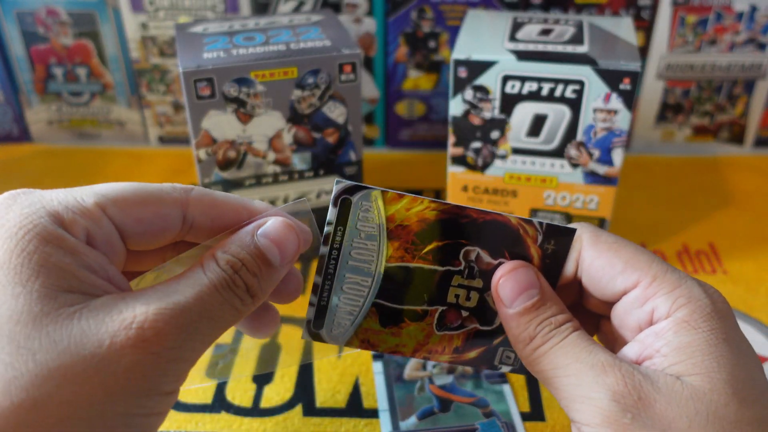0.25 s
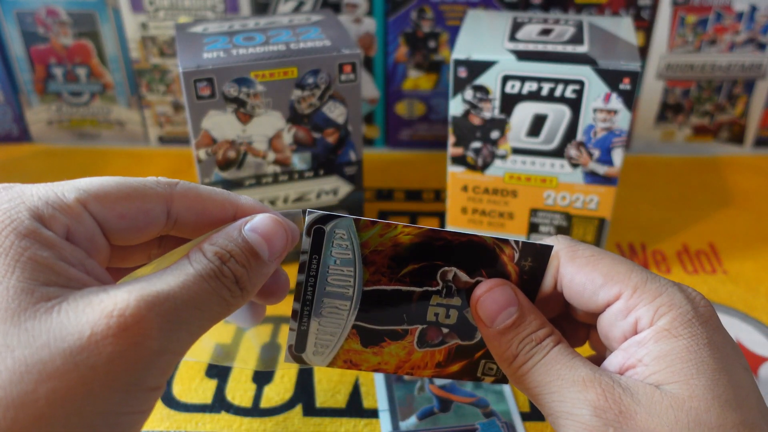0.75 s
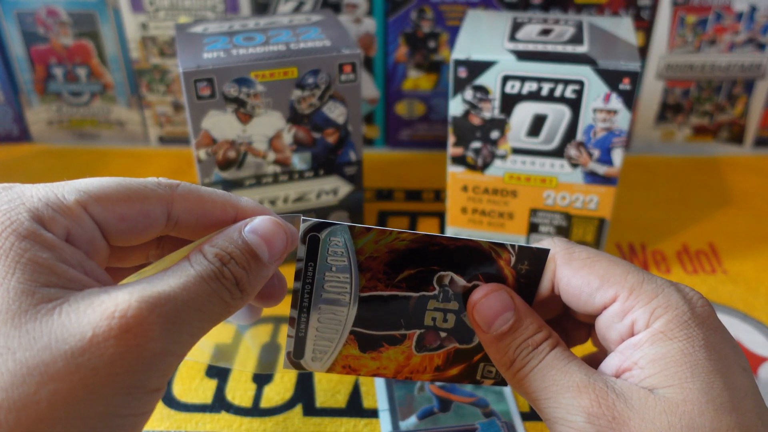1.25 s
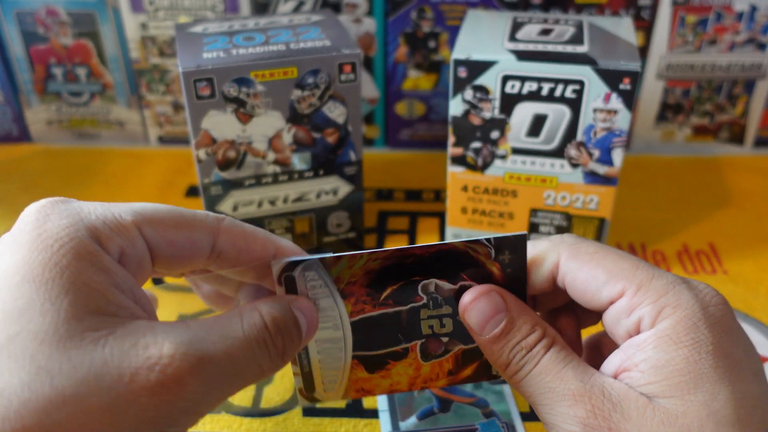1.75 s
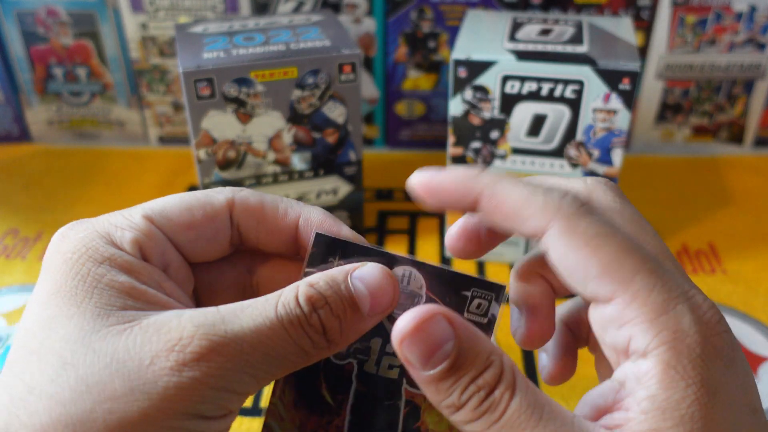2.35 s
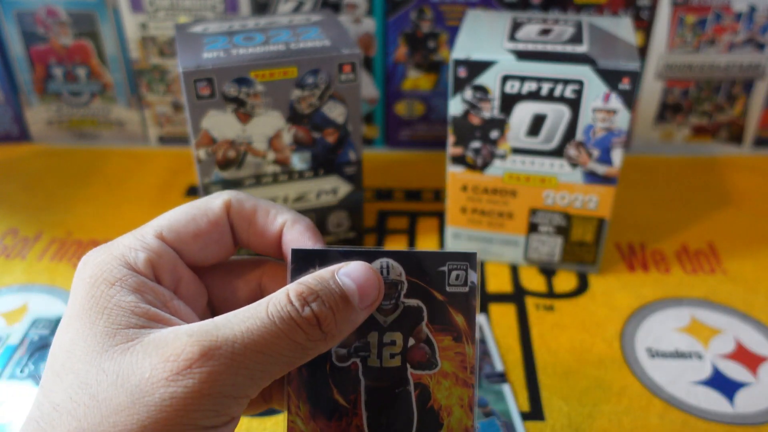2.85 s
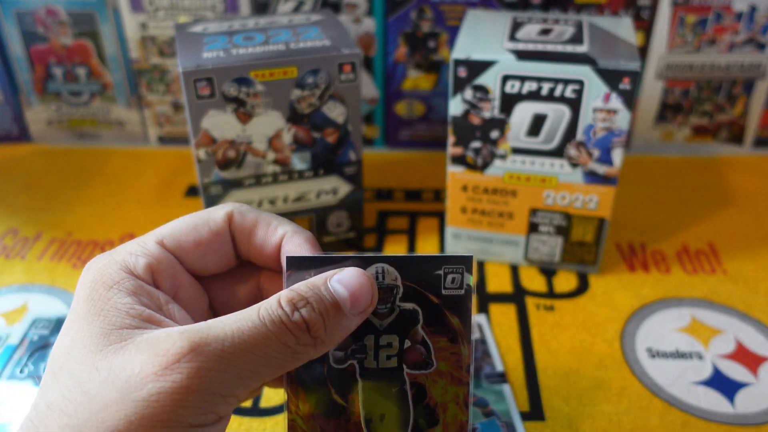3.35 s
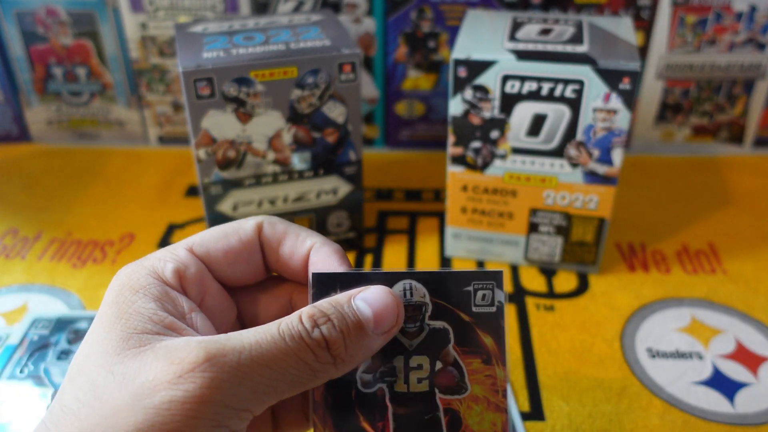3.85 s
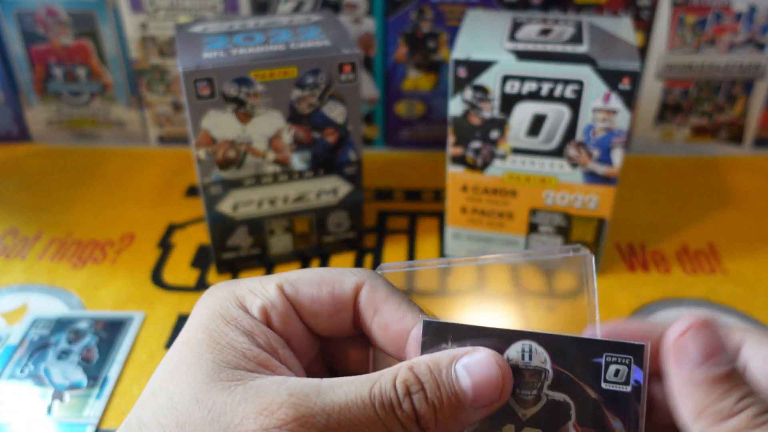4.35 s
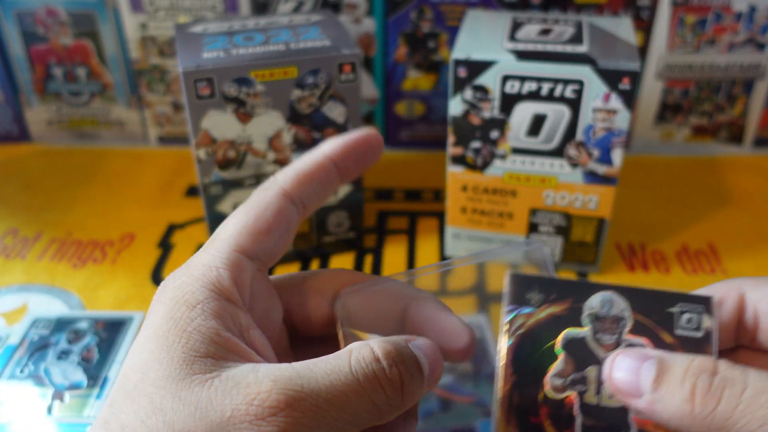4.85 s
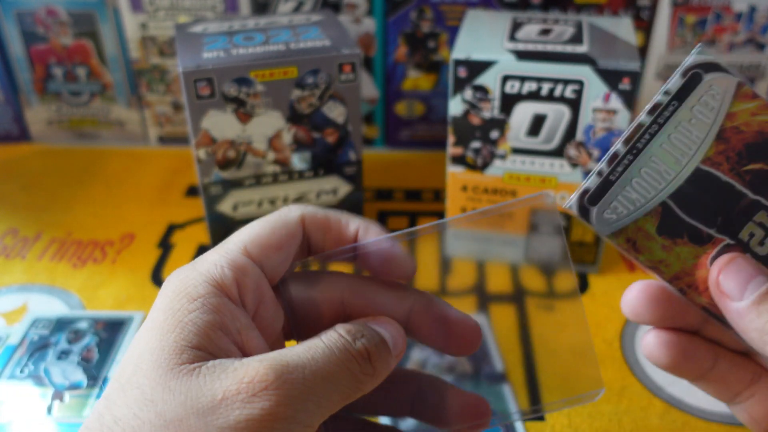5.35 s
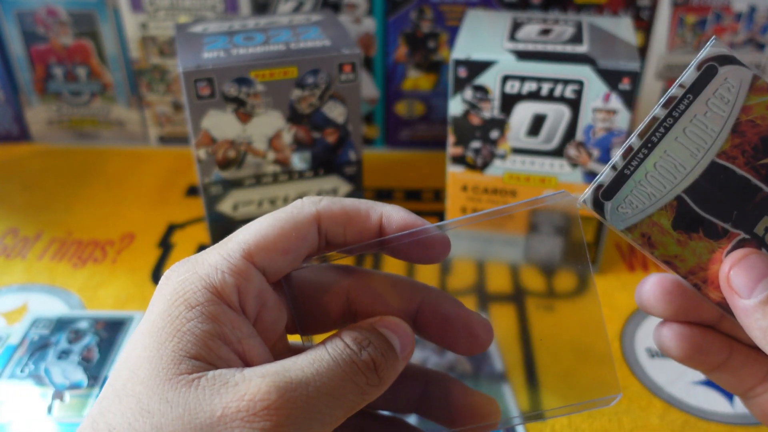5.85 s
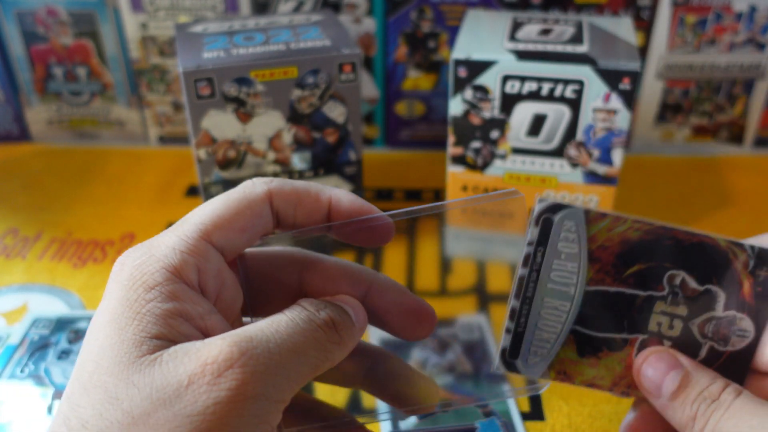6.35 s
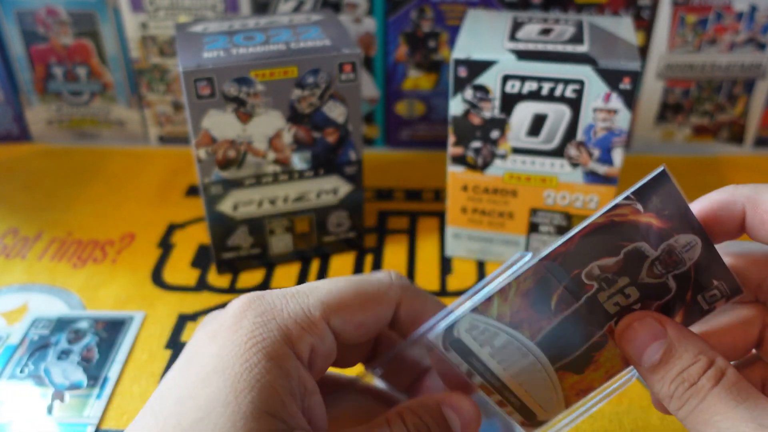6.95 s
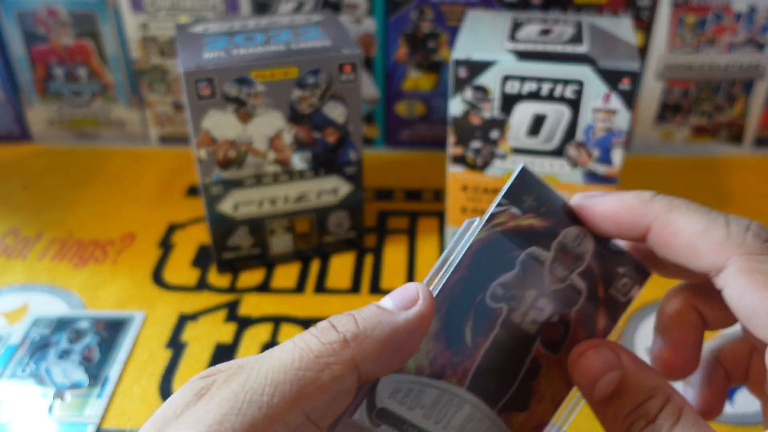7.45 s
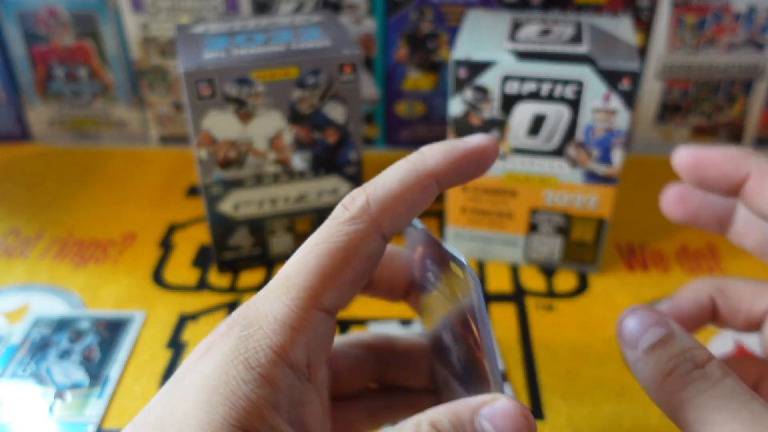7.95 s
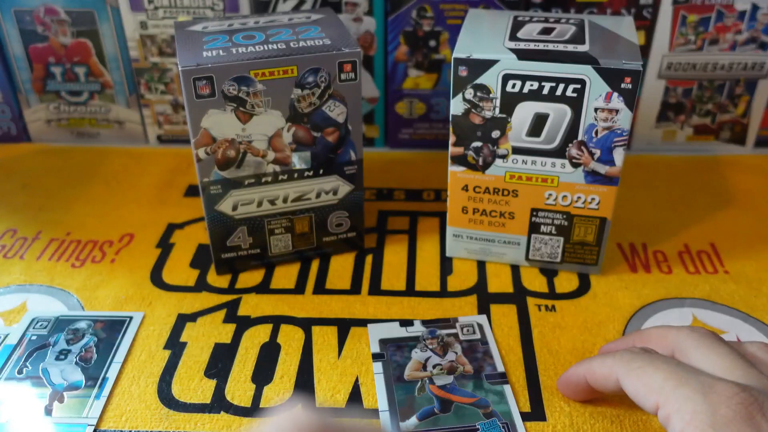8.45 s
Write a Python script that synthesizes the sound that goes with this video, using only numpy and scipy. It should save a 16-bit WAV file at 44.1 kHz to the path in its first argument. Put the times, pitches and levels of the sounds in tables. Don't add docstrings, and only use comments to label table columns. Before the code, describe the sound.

A small room heard from close above a padded table, with steady low motor hum, faint hiss and deep rumble from leaning arms. From 0 to 0.9 s, small dry ticks of fingertips, card and stiff film, densest at the start. It is almost quiet until 1.65 s, then soft rubbing and light clicks, a bright crease pop at 2.2 s, and a fuller brushing stroke with a faint high squeak around 2.7 s. The card taps the mat at 3.1 s and more sharply at 3.4 s. From 3.5 to 5 s, holder strokes, clicks and thin squeaks; at 5.1-5.4 s, a rapid run of bright, ringing plastic flicks. Sparse clicks and gentle sliding follow from 5.6 to 7 s, then denser scraping, a faint two-toned squeak at 7.2 s and a loud crisp snap at 7.4 s. Rubbing fades; at 8.5 s a hand lands in a strong, woody double thump that rings briefly.

```python
import sys
import numpy as np
from scipy import signal
from scipy.fft import rfft, irfft, next_fast_len
from scipy.io import wavfile
from scipy.ndimage import map_coordinates

SR = 44100
rng = np.random.default_rng(int(sys.argv[2]) if len(sys.argv) > 2 else 0)


def magnitude_from_level(level_db):
    exponent = np.asarray(level_db, float) / 20
    return 10 ** exponent


def inscribe(sig):
    pcm = np.round(np.clip(np.atleast_2d(sig).T, -1, 1) * 32767)
    wavfile.write(sys.argv[1], SR, pcm.astype(np.int16))


N = 383650
SPAN = 16384
STEP = 128

# start_s, peak_db, ring_hz, room_answer_db
SNAPS = [(0.092, -30.5, 5400, -7), (0.115, -31, 3570, -8.5), (1.9736, -51.5, 3220, 2.5),
         (4.3278, -35, 3600, -4), (4.369, -31, 4640, -7), (4.5362, -37, 3120, -6), (5.1153, -46, 3000, 0),
         (5.8672, -35, 5800, -10.5), (6.036, -40.5, 4970, -9), (6.3458, -41, 4400, -5.5),
         (8.2942, -42.5, 3900, 4)]
# start_s, peak_db, ring_hz, room_answer_db
TAPS = [(0.0501, -38.5, 5800, -5), (0.0543, -38, 6300, -11), (.121, -35.5, 6500, -9),
        (.247, -52, 3530, -11), (.4564, -35.5, 3700, -3), (0.636, -43, 5400, -9), (0.7852, -47.5, 3180, -9),
        (1.692, -35.5, 5140, -4), (1.8225, -43.5, 4500, -3.5), (1.835, -43.5, 2600, -3),
        (1.76, -43, 5000, -8), (2.161, -45, 3200, -13), (6.905, -50, 4300, -10), (2.319, -48, 9100, 0),
        (3.397, -25.5, 4500, -1.5), (3.4033, -22.5, 4570, -10), (7.306, -42, 7060, -2),
        (7.3413, -45, 3690, -6)]
# start_s, peak_db, ring_hz, room_answer_db
FLICKS = [(3.079, -31.5, 4100, -3.5), (3.747, -46.5, 5800, 5), (3.757, -46, 6500, 3.5),
          (4.7117, -31.5, 5140, -7.5), (5.088, -49, 3630, -10), (5.1143, -42, 12500, -14),
          (5.8676, -41, 11000, -10), (5.1297, -28.5, 5050, -12), (5.3119, -29.5, 5150, -4),
          (5.3315, -31.5, 5040, -5), (5.352, -31, 5300, -8), (5.373, -34, 5200, -8.5),
          (.8979, -56, 3370, -5), (5.7244, -56, 3140, -11), (3.932, -51, 7000, -10),
          (6.7602, -43, 4970, -3.5)]
# start_s, peak_db, ring_hz,
# room_answer_db
CREASES = [(0.2897, -43, 5500, -9), (0.321, -38.5, 5300, -8), (.35, -48, 7000, -8),
           (0.451, -34.5, 6760, -8), (0.654, -45, 4640, -12), (1.3255, -47, 3260, -11),
           (1.6586, -45, 5740, -5), (2.171, -27, 8700, -8.5), (2.3353, -41.5, 5800, -14),
           (3.379, -37, 3130, 3), (3.5735, -40, 4160, 1), (3.6015, -38.5, 5700, -6.5),
           (4.2523, -40.5, 4860, -6.5), (4.55, -34, 3480, -27), (4.6188, -38.5, 5200, -4.5),
           (4.8742, -45.5, 4430, -6), (5.028, -51, 3740, -9), (5.607, -54, 4870, -11),
           (6.1633, -47.5, 5070, -7), (6.3877, -44.5, 4470, -11), (6.627, -45, 5030, -3),
           (7.861, -41, 5840, -16), (6.651, -43.5, 5400, 1.5), (6.713, -41.5, 6000, -4),
           (7.32, -54, 9000, -13), (7.4233, -19.5, 7330, -10.5), (8.524, -40, 4300, 6.5)]
# dull_part_db, bright_part_db
CLICK_COLOURS = [
    (2.5, -1.5),
    (-0.5, -13),
    (-12, -7.5),
    (-17, -14),
]
# start_s, pitch_hz, width_hz, level_db
RINGS = [(.092, 3670, 250, -42), (4.1, 2400, 300, -48), (4.712, 3600, 240, -40), (4.712, 7240, 330, -42),
         (5.13, 5030, 170, -36), (5.131, 8000, 350, -45), (5.313, 6750, 300, -43), (5.313, 3100, 200, -39),
         (5.352, 4800, 200, -40), (8.5205, 1540, 720, -28), (8.54, 870, 440, -26), (4.75, 3530, 150, -51),
         (3.405, 250, 98, -39), (7.424, 7100, 2400, -31), (.6365, 5600, 500, -52), (5.13, 3650, 160, -43),
         (5.313, 5310, 190, -33.5), (7.335, 2500, 180, -44), (7.776, 4400, 1400, -48),
         (2.73, 250, 150, -30.5), (3.4, 610, 300, -26), (8.18, 10400, 3500, -51), (8.525, 214, 28, -22),
         (2.36, 1140, 59, -50.5), (.12, 580, 200, -42.5)]

# middle_s, length_s, film_db, colour_hz,
# edge_over_film_db
FILM_STROKES = [(.01, 0.11, -68, 5600, -9), (0.293, 0.21, -64, 5000, -12), (.6, .35, -74, 4800, -2),
                (1.31, .15, -77, 3900, -8), (1.724, 0.24, -55.5, 5270, -9), (1.844, 0.072, -57, 4500, -5),
                (1.927, .2, -67, 6000, -6), (2.047, 0.32, -63.5, 6500, -1.5), (2.14, .12, -62, 8400, -7),
                (2.323, 0.23, -66.5, 7500, 4), (2.752, 0.27, -54.5, 3950, -9),
                (3.2, 0.57, -65.5, 4800, -7), (3.315, 0.18, -64, 5500, -8),
                (3.466, 0.26, -51, 4400, -11), (3.723, 0.34, -57, 5000, -24),
                  (4.03, 0.22, -60, 5700, -6.5), (4.355, .2, -77, 5000, 4), (4.645, 0.34, -57.5, 5200, -5),
                  (4.904, 0.2, -62, 6000, -1), (5.04, 0.33, -61, 4900, -13), (5.188, 0.19, -69.5, 5400, 13),
                  (5.363, 0.14, -55, 5000, -6), (5.5, 0.29, -71.5, 5400, -2), (6.12, 0.29, -64, 5500, -6),
                  (6.367, 0.33, -65, 4600, -6), (6.733, 0.25, -63, 5800, 3), (6.913, 0.4, -61, 4700, -10),
                  (7.044, 0.087, -60.5, 5300, -5), (7.143, 0.15, -59, 5360, -7.5),
                  (7.37, 0.28, -56, 6200, -15), (7.596, 0.2, -51, 6700, -19),
                  (7.9, 0.33, -54.5, 4860, -10.5), (8.276, 0.3, -58, 4870, 0.5)]
# middle_s, length_s, card_db, palm_db
GRIPS = [(.15, .5, -53.5, -70), (0.528, 0.53, -63, -59), (1.784, 0.98, -83, -57.5), (2.13, 0.15, -62, -63),
         (2.34, 0.19, -84, -58), (2.73, 0.41, -71, -47.5), (2.762, 0.1, -44.5, -50), (3.155, 0.4, -79, -46),
         (3.448, 0.18, -48.5, -46), (3.618, 0.26, -69, -54.5), (4.036, 0.47, -61, -55.5),
         (4.536, 0.53, -70, -55), (4.887, 0.21, -68, -54.5), (5.224, 0.4, -64, -54),
         (6.197, 0.21, -71, -72), (6.85, 0.57, -58.5, -68), (7.192, 0.45, -61.5, -54.5),
         (7.385, 0.2, -51, -57), (7.914, 0.27, -59, -92), (8.205, .2, -57.5, -62), (8.296, 0.2, -50.5, -54),
         (8.7, 0.32, -44, -38)]
# film_db, edge_db, card_db, palm_db
REST_DB = (-82, -88.5, -75, -57)
FILM_HZ = np.array([3600, 5400, 8000])
# multiple_of_colour, level_db (per Hz)
FILM_SPECTRUM = [(.2, -70), (.5, -7), (.78, 2), (1, 3), (1.35, -1.5), (2.2, -22), (5, -68)]
# freq_hz, level_db (per Hz)
EDGE_SPECTRUM = [(2500, -58), (6000, -16.5), (9000, -10.5), (11000, -20.5), (13500, -17), (15700, -27),
                 (16000, -60)]
# freq_hz, level_db (per Hz)
CARD_SPECTRUM = [(300, -70), (1000, 1), (1600, 1), (2300, 0), (3500, -9.5), (7000, -15.5), (16000, -68)]
# freq_hz, level_db (per Hz)
PALM_SPECTRUM = [(60, -62), (130, 3.5), (250, 5.5), (600, -3), (1200, -5), (2500, -15.5), (8000, -84)]
# time_s, pitch_hz, level_db, upper_mode_db
SQUEAKS = [
    [(2.63, 10200, -68, -20), (2.71, 10000, -71, -20)],
    [(4.07, 9750, -65, -20), (4.12, 9650, -70, -20), (4.145, 8900, -80, -30), (4.21, 8900, -77, -30)],
    [(4.145, 11950, -80, -40), (4.17, 11750, -78, -40), (4.195, 11200, -80, -40)],
    [(7.18, 8900, -76, -5), (7.22, 9200, -72, -6), (7.265, 9350, -72, -6), (7.3, 9150, -68, -5)],
]

# start_s, peak_db, thud_db, slap_db, contact_s, body_hz
KNOCKS = [
    (3.088, -25, 3, -11, 0.0067, 690),
    (3.3958, -27.5, -6.5, 3, 0.0075, 253),
    (3.592, -43, -4, 23, 0.014, 845),
    (4.268, -39.5, 6, -2, 0.012, 268),
    (8.301, -47.5, 21.5, -14, 0.027, 280),
    (8.521, -13.5, -2, -10, 0.0064, 337),
    (8.5355, -10, -11, -13.5, 0.007, 320),
]
# pitch_hz, level_db, t60_s
TABLE_TOP = [(213, 10.5, 0.43), (249, 5.5, 0.17), (318, 8.5, 0.22), (484, 8, 0.14), (546, 0.5, 0.15),
             (728, -1, 0.042)]
# pitch_hz, level_db, t60_s
HAND_MODES = [(214, -3, .37), (253, -3.5, 0.34), (323, 4, 0.19), (354, -8, 0.26), (397, -14, .5),
              (494, -6, 0.23), (587, -9, 0.29), (690, -7, 0.2), (740, -6.5, 0.25), (888, -14.5, .35),
              (957, -18, .3), (1087, -17, 0.39), (1580, -19, 0.22), (1670, -21, .3)]
# pitch_hz, level_db, t60_s
CARD_MODES = [(450, -10.5, 0.24), (640, -7, .3), (687, -8, 0.23), (760, 3, .04), (904, -12, 0.26),
              (1034, -4.5, 0.25), (1136, -11, .3), (1389, -20, 0.26)]
# start_s, level_db, modes
STRUCK = [
    (8.5205, -18.5, HAND_MODES),
    (8.5365, -19.5, HAND_MODES),
    (3.0895, -30, CARD_MODES),
    (3.397, -44, CARD_MODES),
]

# freq_hz, t60_s
ROOM_DECAY = [(100, 0.31), (500, 0.3), (2000, 0.42), (6000, 0.39), (14000, 0.29)]
# delay_s, level_db
WALLS = [(.0034, -12), (.0072, -6), (.0158, -7), (.0245, -13)]

# pitch_hz, level_db (rms)
HUM = [(120, -47), (162, -64), (240, -67), (360, -58.5)]
# freq_hz, level_db (per Hz)
AIR = [(76, -28), (130, -1), (176, -7.5), (194, -10), (228, -6), (327, -21), (361, -8.5), (391, -86),
       (459, -20.5), (620, -18), (1040, -19.5), (1790, -22.5), (2150, -32), (2370, -45), (15600, -65)]
# freq_hz, level_db (per Hz)
HISS = [(1200, -30), (2500, -3.5), (6000, -4), (10000, -8), (15700, -8), (16000, -50)]
# time_s, sway_db
LEANING = [(0.0, -35.5), (0.51, -32.5), (0.61, -46.5), (1.38, -32.5), (1.48, -50), (1.82, -26.5),
           (3.05, -38), (3.39, -28), (3.54, -40), (4.8, -21.5), (6.13, -48.5), (6.25, -31), (6.76, -38.5),
           (7.07, -19.5), (7.78, -35), (7.87, -26.5), (8.21, -30), (8.7, -20.5)]
# freq_hz, level_db (per Hz)
SWAY = [(3, -36), (8, -3), (15, 13.5), (22, 5), (32, 3.5), (55, -31), (150, -120)]
# middle_s, length_s, level_db
JOLTS = [(0.435, 0.61, -51.5), (2.034, 0.16, -45), (2.207, 0.13, -51), (2.537, 0.35, -49.5),
         (2.834, 0.21, -44), (3.14, 0.16, -32.5), (3.644, 0.33, -46.5), (4.312, 0.57, -44),
         (4.551, 0.11, -36.5), (4.788, 0.32, -45.5), (5.287, 0.12, -40.5), (6.35, 0.12, -47),
         (6.74, 0.091, -48), (7.1, 0.78, -45), (7.458, 0.19, -52), (7.876, 0.18, -47), (8.317, 0.51, -49),
         (8.548, 0.15, -31), (8.7, 0.22, -31.5)]
# freq_hz, level_db (per Hz)
RUMBLE = [(8, -97), (22, -27), (40, -3), (60, -1), (95, -1.5), (125, -6), (200, -28.5), (500, -120)]


def unit(x):
    return x / np.sqrt(np.mean(x ** 2) + 1e-20)


def along(points, hz):
    f, v = np.transpose(points)
    return np.interp(np.log(hz + 1), np.log(f + 1), v)


def curves(rows):
    s, *columns = np.transpose(rows)
    return [np.interp(np.arange(N) / SR, s, column) for column in columns]


def wobble(rate):
    knots = rng.standard_normal(int(N * rate / SR) + 4)
    return map_coordinates(knots, [np.arange(N) * rate / SR])


def swell(s, length_s):
    t = np.arange(0, N + STEP, STEP) / SR
    return np.exp(-(3.71 * (t - s) / length_s) ** 2 / 2)


def smooth(control):
    return np.interp(np.arange(N) / STEP, np.arange(len(control)), control)


def filtered(x, response):
    m = next_fast_len(len(x) + 8192)
    return irfft(rfft(x, m) * response(np.fft.rfftfreq(m, 1 / SR)), m)[:len(x)]


def peak(f, hz, width_hz):
    return 1j * f * width_hz / (hz * hz - f * f + 1j * f * width_hz)


def causal(gain):
    size = 4096
    cepstrum = irfft(np.log(gain(np.fft.rfftfreq(size, 1 / SR)) + 1e-6))
    cepstrum[1:size // 2] *= 2
    cepstrum[size // 2 + 1:] = 0
    return irfft(np.exp(rfft(cepstrum)))[:size // 2]


def noise(spectrum, excite=1):
    return unit(filtered(excite * rng.standard_normal(N), lambda f: magnitude_from_level(along(spectrum, f))))


def echoed(x):
    out = np.pad(x, (0, SPAN))[:SPAN]
    return out + sum(magnitude_from_level(db) * np.pad(out, (round(s * SR), 0))[:SPAN] for s, db in WALLS)


def room(x, delay_s):
    hz, t, z = signal.stft(rng.standard_normal(SPAN), SR, nperseg=256)
    decay = magnitude_from_level(-60 * t / along(ROOM_DECAY, hz)[:, None])
    tail = signal.istft(z * decay, SR, nperseg=256)[1][:SPAN]
    tail = tail * (1 - np.exp(-np.arange(SPAN) / SR / delay_s))
    return signal.fftconvolve(x, tail / np.linalg.norm(tail))[:SPAN]


def clicks():
    out, t = np.zeros(N + SPAN), np.arange(600) / SR
    kinds = zip((SNAPS, TAPS, FLICKS, CREASES), CLICK_COLOURS)
    every = [row + colour for rows, colour in kinds for row in rows]
    for s, db, hz, room_db, dull_db, bright_db in every:
        bands_db = np.minimum(2.8 * rng.standard_normal(160), 3.5)

        def colour(f):
            ring = abs(peak(f, hz, 0.68 * hz)) ** 2 + 0.35 * abs(peak(f, hz, 0.04 * hz))
            dull = magnitude_from_level(dull_db + 6.5) * abs(peak(f, 1800, 3000)) ** 2
            bright = magnitude_from_level(bright_db + 0.5) * abs(peak(f, 7940, 4300)) ** 2
            damping = magnitude_from_level(np.interp(f / 140, np.arange(len(bands_db)), bands_db))
            return (ring + dull + bright) * damping

        plastic = causal(colour)
        envelope = magnitude_from_level(-60 * t / 0.011) * (1 - np.exp(-t / 0.00058))
        snap = np.convolve(plastic, envelope * rng.standard_normal(len(t)))
        snap = magnitude_from_level(db) * snap / np.abs(snap).max()
        answer = room(plastic / np.linalg.norm(plastic) * np.linalg.norm(snap), delay_s=0.0081)
        out[round(s * SR):][:SPAN] += echoed(snap) + magnitude_from_level(room_db + 8) * answer
    return out[:N]


def rings():
    out = np.zeros(N + SPAN)
    for s, hz, width_hz, db in RINGS:
        mode = causal(lambda f: abs(peak(f, hz, width_hz)) ** 2)
        answer = room(mode, delay_s=0.0046)
        both = answer + magnitude_from_level(-4) * echoed(mode)
        out[round(s * SR):][:SPAN] += magnitude_from_level(db - 7) * both / np.abs(answer).max()
    return out[:N]


def rubbing():
    slips_db = 1.6 * wobble(500) + 1.5 * wobble(60) + 1.8 * wobble(22)
    slips = magnitude_from_level(slips_db + 1.5 * np.clip(wobble(200), 0, 2.4) ** 1.5)
    films = [noise([(hz * multiple, db) for multiple, db in FILM_SPECTRUM], slips) for hz in FILM_HZ]
    edge = magnitude_from_level(4.0) * noise(EDGE_SPECTRUM, slips)
    card, palm = noise(CARD_SPECTRUM, slips), noise(PALM_SPECTRUM, slips)

    film_rest, edge_gain, card_gain, palm_gain = magnitude_from_level(np.array(REST_DB))
    count = len(FILM_HZ)
    film_gain = film_rest * np.ones((count, 1)) / np.sqrt(count)
    for s, length_s, db, hz, edge_db in FILM_STROKES:
        place = np.interp(np.log(hz), np.log(FILM_HZ), np.arange(count))
        shares = np.sqrt(np.clip(1 - abs(place - np.arange(count)), 0, 1))
        stroke = magnitude_from_level(db) * swell(s, length_s)
        film_gain = film_gain + shares[:, None] * stroke
        edge_gain = edge_gain + magnitude_from_level(edge_db) * stroke
    for s, length_s, card_db, palm_db in GRIPS:
        grip = swell(s, length_s)
        card_gain = card_gain + magnitude_from_level(card_db) * grip
        palm_gain = palm_gain + magnitude_from_level(palm_db) * grip
    gains = (*film_gain, edge_gain, card_gain, palm_gain)
    layers = (*films, edge, card, palm)
    return magnitude_from_level(-5.5) * sum(smooth(gain) * layer for gain, layer in zip(gains, layers))


def squeaks():
    out, t = np.zeros(N), np.arange(N) / SR
    for rows in SQUEAKS:
        hz, db, upper_db = curves(rows)
        fade = np.clip(np.minimum(t - rows[0][0], rows[-1][0] - t) / 0.012, 0, 1)
        phase = 2 * np.pi * np.cumsum(hz + 45 * wobble(150)) / SR
        whistle = np.sin(phase) + magnitude_from_level(upper_db) * np.sin(1.22 * phase)
        out += fade * magnitude_from_level(db + 4 * wobble(70)) * whistle
    return out


def knocks():
    out, t = np.zeros(N + SPAN), np.arange(SPAN) / SR
    for s, db, thud_db, slap_db, contact_s, hz in KNOCKS:
        push = rng.standard_normal(SPAN) * np.exp(-t / contact_s) * (1 - np.exp(-t / 0.0008))

        def colour(f):
            modes = sum(magnitude_from_level(level) * abs(peak(f, c, 6 / t60)) for c, level, t60 in TABLE_TOP)
            body = abs(peak(f, hz, 1.47 * hz)) ** 2 * (1 + 0.79 * modes)
            slap = magnitude_from_level(slap_db) * abs(peak(f, 1040, 1520)) ** 2 / (1 + (f / 2200) ** 4)
            return body + slap

        top = causal(colour)
        blow = signal.fftconvolve(push, top)[:SPAN]
        blow = magnitude_from_level(db) * blow / np.abs(blow).max()
        answer = room(top / np.linalg.norm(top) * np.linalg.norm(blow), delay_s=0.0067)
        thud = filtered(push, lambda f: peak(f, 39, 50) ** 2)
        thud = magnitude_from_level(db + thud_db) * thud / np.abs(thud).max()
        out[round(s * SR):][:SPAN] += echoed(blow) + magnitude_from_level(5.5) * answer + thud
    return out[:N]


def struck():
    out, t = np.zeros(N + SPAN), np.arange(SPAN) / SR
    onset = 1 - np.exp(-t / 0.00067)
    for s, db, modes in STRUCK:
        ring = np.zeros(SPAN)
        for hz, level, t60 in modes:
            ring += magnitude_from_level(level - 60 * t / t60) * np.sin(2 * np.pi * hz * t + rng.uniform(-1.3, 1))
        out[round(s * SR):][:SPAN] += magnitude_from_level(db) * onset * ring
    return out[:N]


def table_shake():
    sway_db, = curves(LEANING)
    rock = np.sqrt(2) * np.sin(2 * np.pi * np.cumsum(12 + 1.3 * wobble(2.4)) / SR)
    sway = magnitude_from_level(sway_db + 1.8 * wobble(3.02)) * (0.99 * rock + 0.29 * noise(SWAY))
    steady = magnitude_from_level(-54 + 0.23 * (sway_db - sway_db.mean()))
    jolts = smooth(sum(magnitude_from_level(db) * swell(s, length_s) for s, length_s, db in JOLTS))
    return sway + (steady + jolts) * noise(RUMBLE)


def background():
    t = np.arange(N) / SR
    hum = np.zeros(N)
    for hz, db in HUM:
        line = np.sin(2 * np.pi * hz * t + 0.46 * wobble(5))
        hum += np.sqrt(2) * magnitude_from_level(db + 0.31 * wobble(8.5)) * line
    return hum + magnitude_from_level(-57) * noise(AIR) + magnitude_from_level(-72.5) * noise(HISS)


def scene():
    plastic = clicks() + rings() + rubbing() + squeaks()
    table = knocks() + struck() + table_shake()
    return (plastic + table + background())[None]


def low_pass(x):
    return signal.sosfilt(signal.butter(12, 15750, fs=SR, output="sos"), x)


def record(dry):
    mix = filtered(dry[0], lambda f: np.where(f < 15900, 1, magnitude_from_level(-16)))[None]
    return low_pass(mix)


dry = scene()
out = record(dry)
inscribe(out)
```